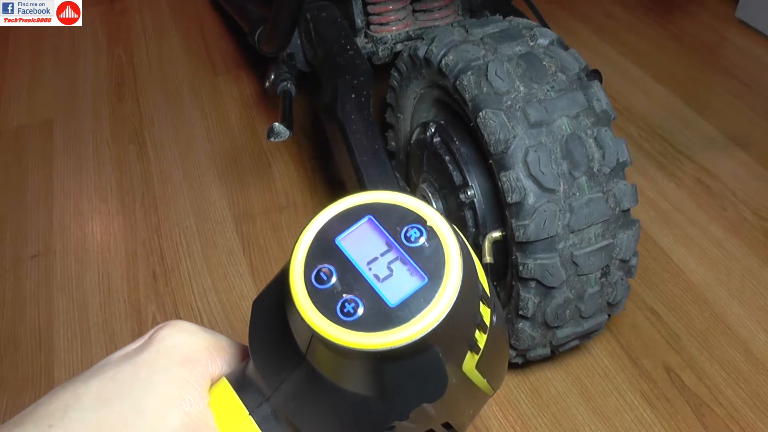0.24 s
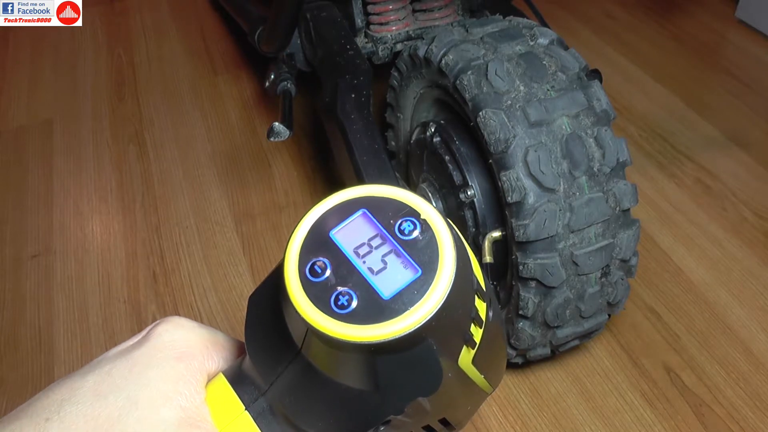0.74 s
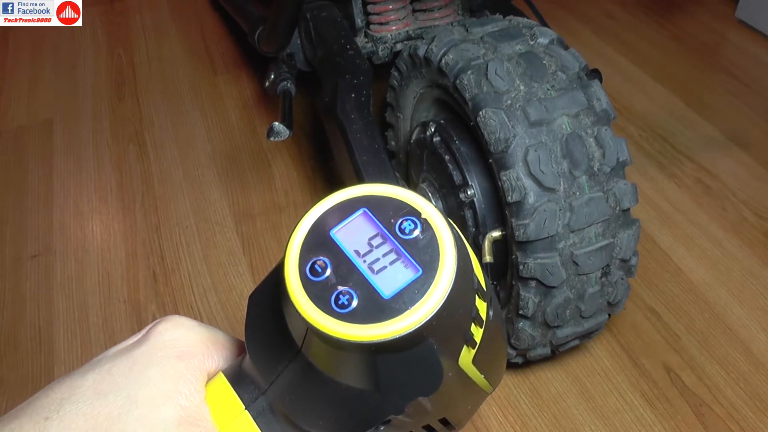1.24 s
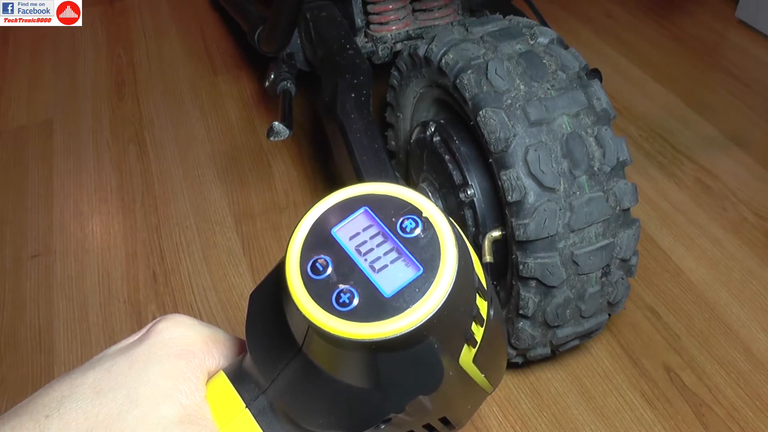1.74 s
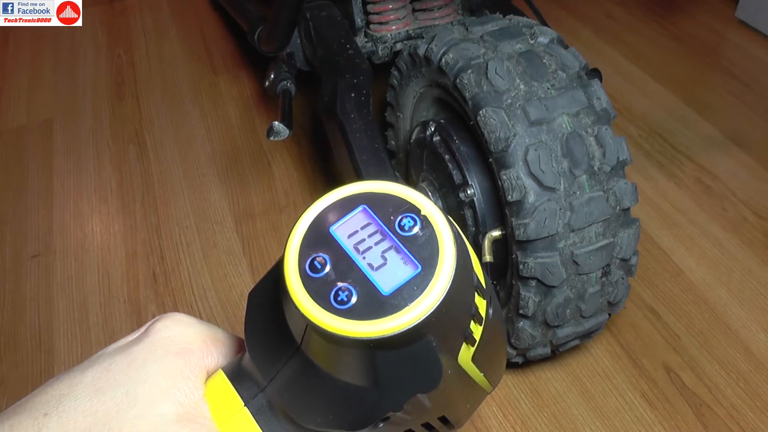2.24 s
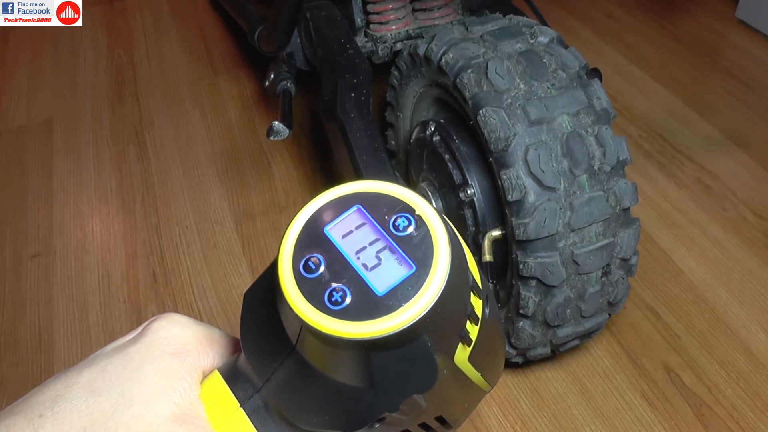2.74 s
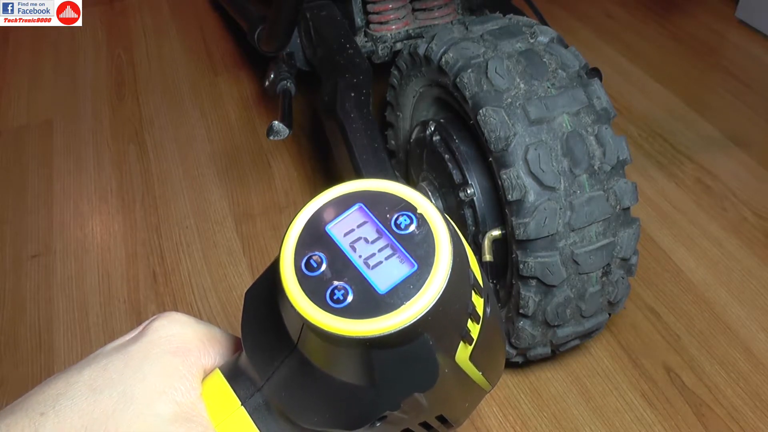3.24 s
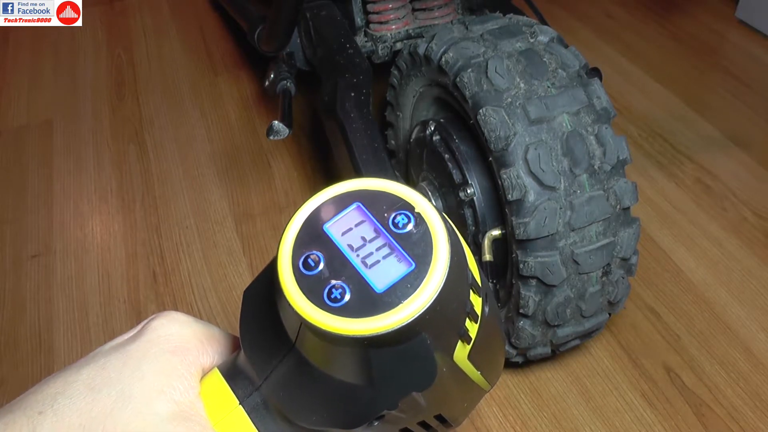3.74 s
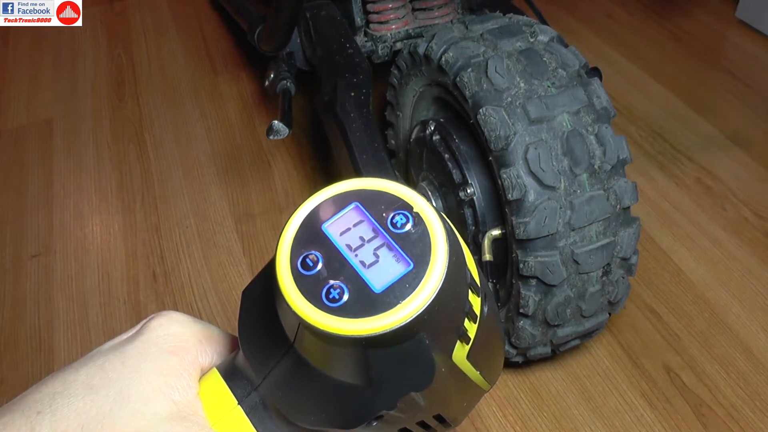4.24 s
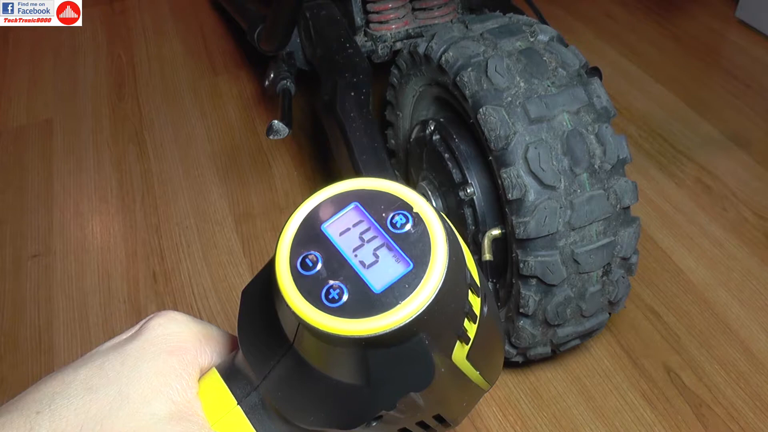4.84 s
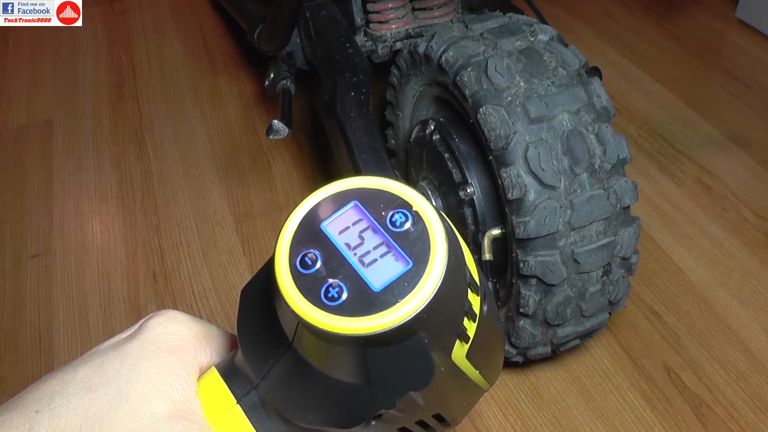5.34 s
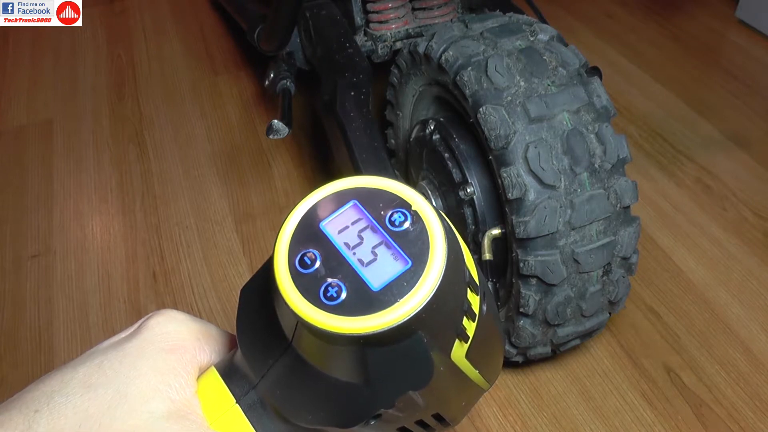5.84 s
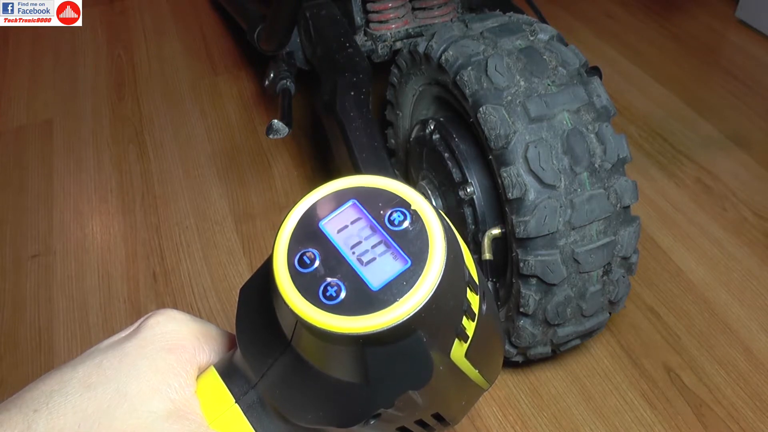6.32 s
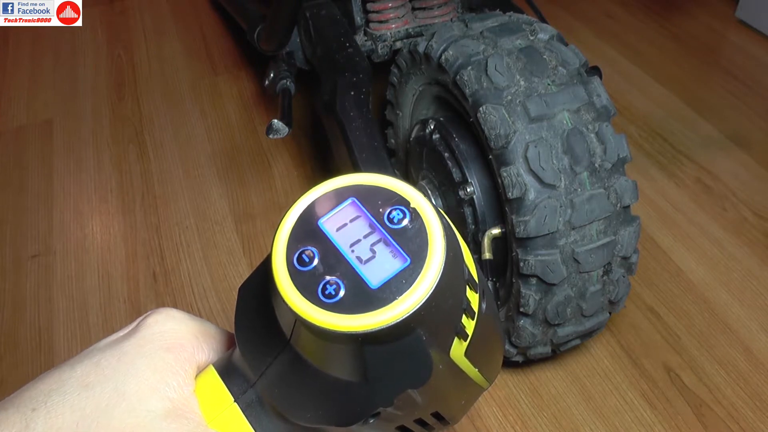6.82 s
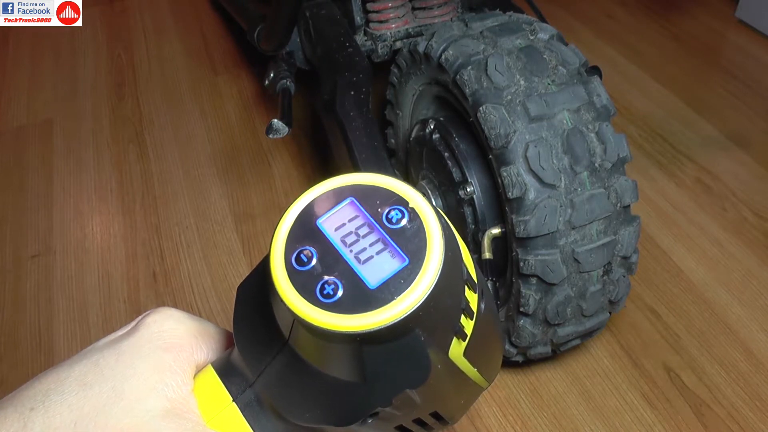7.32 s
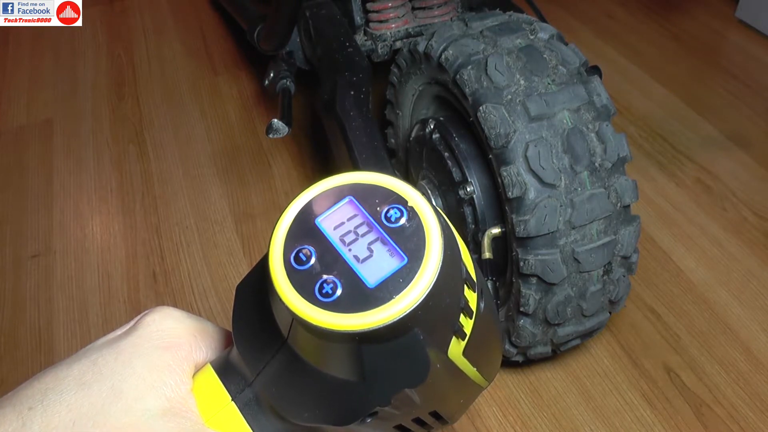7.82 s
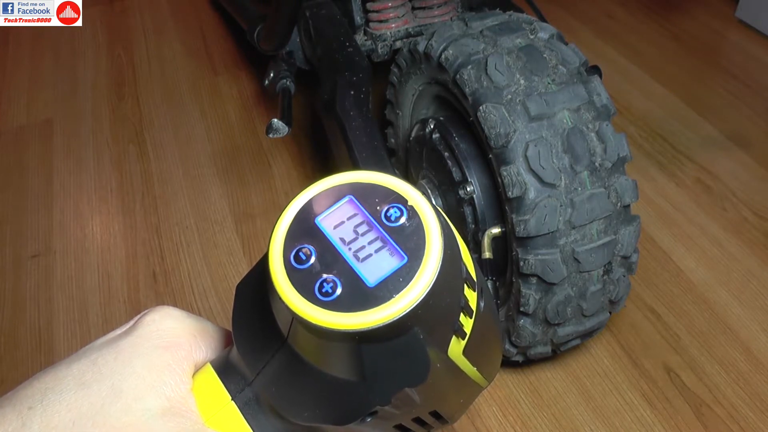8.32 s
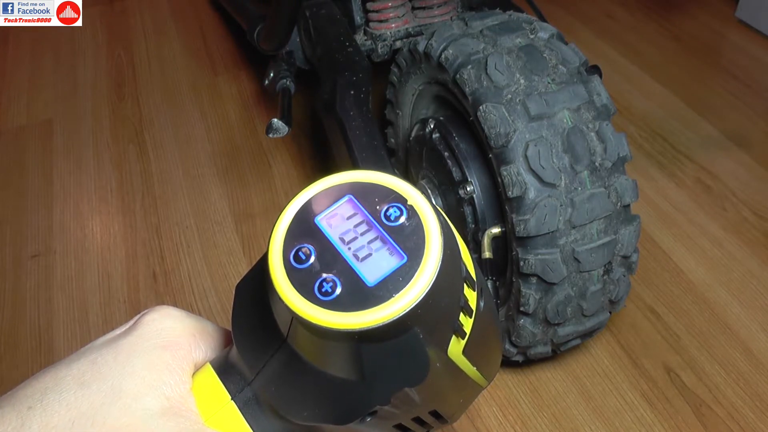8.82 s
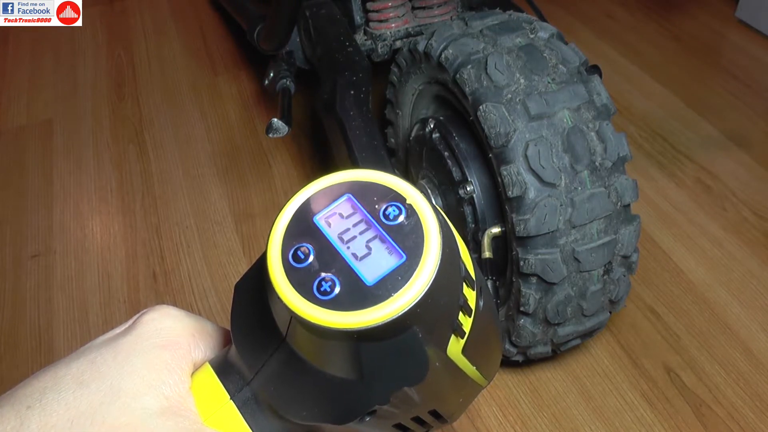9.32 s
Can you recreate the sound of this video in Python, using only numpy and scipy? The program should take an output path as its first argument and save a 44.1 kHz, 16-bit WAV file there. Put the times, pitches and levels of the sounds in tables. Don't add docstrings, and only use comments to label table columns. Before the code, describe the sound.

From 0 seconds a small hand-held battery air pump is already running at full speed, very close to the microphone, in a room with a wooden floor. Its single piston cycles about 52 times a second, too fast to count, merging into a coarse, nasal buzz. Over this sit a sharp, rough gear whine around 2.5 kHz with strong higher tones near 5 and 7.5 kHz, and a bright gritty rattle from the housing, pulsing with every stroke. Valve knocks and slaps add hard chatter in the low mids. Through 3 to 6 seconds the load increases and pitch sinks almost imperceptibly; the knock becomes brighter and harder. From 6 to about 9.6 seconds it is slightly louder and more strained, near 50 strokes a second, with stronger whine and valve ticking. Small unsteady flutters persist. Room reflections stay faint and short, and the pump never stops.

```python
import sys
import numpy as np
from scipy import signal
from scipy.fft import rfft, irfft, next_fast_len
from scipy.io import wavfile
from scipy.ndimage import uniform_filter1d

SR = 44100
rng = np.random.default_rng(int(sys.argv[2]) if len(sys.argv) > 2 else 0)


def dump_mix(stems):
    frames = np.atleast_2d(stems).T
    limited = np.clip(frames, -1, 1)
    pcm = np.round(limited * 32767).astype(np.int16)
    wavfile.write(sys.argv[1], SR, pcm)


def voltage_ratio(level):
    return 10 ** (np.asarray(level, float) / 20)


N = 422037

# time in seconds, crank rate in turns per second.
CRANK_SPEED = [(0.0, 52.23), (0.87, 51.964), (1.74, 51.687), (2.61, 51.418), (3.48, 51.186), (4.35, 50.988),
               (5.22, 50.664), (6.09, 50.423), (6.96, 50.295), (7.83, 50.046), (8.7, 49.892),
               (9.57, 49.785)]
START_TURN = 0.203
GEAR_TEETH, PINION_TEETH = 49, 11

# multiple of the crank rate, level in dB at low, middle and high pressure.
KNOCK_SPECTRUM = [(1, -61, -60.5, -60), (2, -44.8, -45.5, -44.5), (3, -45.8, -49.5, -49),
                  (4, -45.5, -43.5, -40.5), (5, -45, -45.5, -43), (6, -40, -41, -44.5),
                  (7, -43.4, -48, -48), (8, -36.5, -36.5, -38), (9, -49, -39.5, -34),
                  (10, -54.5, -34.5, -35), (11, -43.5, -37.5, -30.5), (12, -42.5, -35, -32.5),
                  (13, -37, -42.5, -39), (14, -31.5, -32.5, -36), (15, -36, -31.5, -32),
                  (16, -39.5, -33.5, -40.5), (17, -44.5, -36.5, -40), (18, -65.5, -40, -54),
                  (19, -56, -59, -42), (20, -45, -52.5, -47), (21, -41.5, -45, -54), (22, -43, -50, -50),
                  (23, -50.5, -49, -52)]
KNOCK_STAGES = (0.85, 5.05, 10)

TOOTH_LOAD = [(1, 0.87, 0.93, 5.0, 4.5), (2, 0.9, 0.9, 3.8, 2.8), (3, 0.97, 0.85, 3.6, 5.2),
              (4, 0.88, 0.95, 3.0, 2.6), (5, 0.85, 0.88, 2.6, 2.4), (6, .9, .9, 3, 3)]
# rms level in dB at low, middle and high pressure.
WHINE_LEVEL = [(-40.5, -37, -29), (-25.5, -26, -25), (-27.5, -24.5, -27.5), (-41, -35.5, -37.5),
               (-37.5, -37.5, -36), (-62, -54, -61)]
WHINE_ROUGHNESS = (0.13, 0.31, 0.32, 1, 0.95, .5)
HARMONIC_SHIFT = (-1, 0, -1, 0, 0, 0)
REVERSAL_HEIGHT = [(0.29, 0.1), (0.23, 0.49), (0.12, 0.35), (0.11, 0.52), (.05, 0.23), (.05, .3)]
PINION_WEAR = [(1, 0.52), (2, 0.22), (4, 0.23)]

# multiple of the motor rate, rms level in dB, swing with load 0-1.
MOTOR_TONES = [(1, -61, 0), (2, -56, 0.6), (3, -36.5, 0), (4, -84, 1), (5, -50.5, 0), (6, -53.5, 1),
               (8, -71, 1), (9, -53.5, 1)]

# frequency in Hz, density in dB per Hz.
RATTLE_SPECTRUM = [(150, -64), (350, -10), (700, -1), (1100, -12.5), (1650, -8), (2300, -9), (3100, -8.5),
                   (4400, -4.5), (5800, -5), (8300, -4.5), (10000, -22), (11500, -26), (13000, -12),
                   (15500, -26)]
# frequency in Hz, swing with load in dB.
RATTLE_SWING = [(300, -24), (1000, 7.5), (3000, 4), (6000, 4), (13000, 10.5)]
# frequency in Hz, share of the flaws still repeating.
FLAWS_REPEATING = [(2500, 1.0), (4500, .7), (7000, .5), (14000, .45)]
# frequency in Hz, width in Hz, level in dB at low and high pressure.
HOUSING_MODES = [(531, 39, -41.5, -50), (794, 110, -41.5, -43), (1085, 100, -41.5, -41),
                 (1873, 48, -41.5, -43.5), (2238, 157, -46, -36.5), (3620, 120, -55, -41),
                 (4138, 75, -41.5, -34.5), (6040, 220, -76, -84), (6600, 65, -42.5, -39.5),
                 (7660, 93, -38, -38), (8885, 480, -33, -34), (10050, 260, -33, -35),
                 (10460, 190, -47.5, -46), (12880, 200, -47, -40)]

# frequency in Hz, likeness of left and right 0-1.
STEREO_LIKENESS = [(60, .98), (290, 0.8), (640, 0.94), (1410, 0.93), (3100, 0.95), (5000, 0.95),
                   (7500, 0.95), (9500, 0.18), (12500, 0.53), (15000, .3)]
# frequency in Hz, left minus right in dB.
BALANCE_LOW = [(60, -6), (110, -1), (200, 0.5), (380, 0), (700, -1.5), (1290, -1), (2380, 2.5), (4400, 0),
               (8120, -0.5), (15000, -8)]
# frequency in Hz, left minus right in dB.
BALANCE_HIGH = [(60, -4), (110, -1.5), (200, -1), (380, -4), (700, 0), (1290, -1), (2380, 5.5), (4400, 1.5),
                (8120, 2.5), (15000, -5)]


def rms_one(x):
    return x / np.sqrt(np.mean(np.abs(x) ** 2) + 1e-20)


def in_time(rows):
    s, *columns = np.transpose(rows)
    return [np.interp(np.arange(N) / SR, s, c) for c in columns]


def at_hz(points, hz):
    table = np.array(points)
    return np.interp(np.log(hz), np.log(table[:, 0]), table[:, 1])


def with_pressure(*values):
    return np.interp(np.linspace(0, 1, N), np.linspace(0, 1, len(values)), values)


def drift(hz):
    sos = signal.butter(2, hz, fs=SR / 8, output="sos")
    settled = signal.sosfilt(sos, rng.standard_normal(N // 8 + 4002))[4000:]
    return np.interp(np.arange(N) / 8, np.arange(len(settled)), rms_one(settled))


def load(turn, centre, sharpness):
    return np.exp(sharpness * (np.cos(2 * np.pi * (turn - centre)) - 1))


def placed(x, hz):
    half_db = with_pressure(at_hz(BALANCE_LOW, hz), at_hz(BALANCE_HIGH, hz)) / 2
    return np.array([x * voltage_ratio(half_db), x * voltage_ratio(-half_db)])


def spread(pair, hz):
    alike = np.clip(at_hz(STEREO_LIKENESS, hz), 0, 1)
    shared = np.sqrt((1 + alike) / 2) * placed(pair[0], hz)
    opposed = np.sqrt((1 - alike) / 2) * pair[1] * [[1], [-1]]
    return shared + opposed


def knock(turn):
    valve_shuts = with_pressure(0.1266, 0.1716)
    shake_orders, shake_turn, shake_lead_cycles = 3, 0.13, 0.24
    log_size = np.log(voltage_ratio(np.array(KNOCK_SPECTRUM)[:, 1:].T))
    cepstrum = irfft(np.pad(log_size, ((0, 0), (1, 41)), mode="edge"), axis=1)
    cepstrum[:, 1:64] *= 2
    cepstrum[:, 65:] = 0
    lag = rfft(cepstrum, axis=1).imag
    since = 2 * np.pi * (turn - valve_shuts)
    uneven = 0.14 * drift(30)
    late = 0.004 * drift(30)
    seconds = np.arange(N) / SR
    lag_share, turned = with_pressure(0.81, 0.41), with_pressure(0.1, 0.72)
    out = 0
    for k, row in enumerate(KNOCK_SPECTRUM, start=1):
        high = min(k / 21.4, 1) ** 2
        phase = np.interp(seconds, KNOCK_STAGES, lag[:, k])
        size_db = np.interp(seconds, KNOCK_STAGES, row[1:])
        if k <= shake_orders:
            wave = np.cos(2 * np.pi * (k * (turn - shake_turn) + shake_lead_cycles))
        else:
            angle = since + high * late - 0.13 * (1 - high) ** 4
            wave = np.cos(k * angle + lag_share * phase + turned)
        out = out + placed(voltage_ratio(size_db) * (1 + high * uneven) * wave, 51 * k)
    return np.sqrt(2) * out


def gears(turn):
    idle_force = 0.06
    ripple = with_pressure(0.004, 0.024)
    angle = 2 * np.pi * turn + ripple * np.sin(2 * np.pi * (turn - 0.7)) + 0.0018 * drift(6.2)
    pinion = 2 * np.pi * turn * GEAR_TEETH / PINION_TEETH
    reversal = load(turn, 0.11, 4.5)
    out = 0
    for row, level_db, rough, shift, slack in zip(
            TOOTH_LOAD, WHINE_LEVEL, WHINE_ROUGHNESS, HARMONIC_SHIFT, REVERSAL_HEIGHT):
        k = round(row[0])
        force = load(turn, with_pressure(*row[1:3]), with_pressure(*row[3:5]))
        force = force + with_pressure(*slack) * reversal + idle_force
        wear = 0
        for m, depth in PINION_WEAR:
            for side in (-1, 1):
                wear = wear + depth * np.exp(1j * (side * round(m) * pinion + rng.uniform(0, 2 * np.pi)))
        waver = 1 + rough * (wear + 0.45 * (drift(113) + 1j * drift(110)))
        carrier = np.exp(1j * (k * GEAR_TEETH + shift) * angle)
        tone = rms_one(force * waver * carrier) * np.sqrt(2) * 1j ** (k // 3)
        level = voltage_ratio(with_pressure(*level_db) - 0.16 * drift(3.8))
        out = out + level * spread([tone.real, tone.imag], 2500 * k)
    return out


def motor(turn):
    out = 0
    for k, db, swing in MOTOR_TONES:
        order = round(k) * GEAR_TEETH / PINION_TEETH
        tone = np.cos(2 * np.pi * (order * turn + rng.random()))
        swell = 1 + 2 * swing * np.cos(2 * np.pi * (turn - 0.1))
        out = out + placed(np.sqrt(2) * voltage_ratio(db) * swell * tone, 51 * order)
    return out


def tooth_noise(turn):
    repeating = (0.71, 0.099)
    fresh = rng.standard_normal((2, 2, N))
    out = fresh * np.sqrt(max(1 - np.sum(np.square(repeating)), 0.05))
    for share, ratio in zip(repeating, (1, GEAR_TEETH / PINION_TEETH)):
        cells = 2 * round(430 / ratio)
        even_spectrum = np.exp(2j * np.pi * rng.random((2, 2, cells // 2 + 1)))
        flaws = rms_one(irfft(even_spectrum))
        out += share * flaws[..., (turn * ratio % 1 * cells).astype(int)]
    return out, fresh


def rattle(turn):
    teeth, air = tooth_noise(turn)
    blow = load(turn, 0.32, 5.4)
    squeeze = load(turn, 0.895, 1.6) + load(turn, 0.17, 3.9)
    rush = load(turn, 0.92, 2.6) + with_pressure(0.15, 0.64) * load(turn, 0.13, 4.5) + 0.057

    def source(k, hz):
        timing = blow if hz < 850 else squeeze if hz < 7500 else rush
        if hz < 900:
            return air[k % 2], timing
        kept = at_hz(FLAWS_REPEATING, hz)
        return kept * teeth[k % 2] + np.sqrt(1 - kept ** 2) * air[1 - k % 2], timing

    edges = 110 * 2 ** np.arange(0, 7.3, 0.4)
    bands = 0
    for k, (low, high) in enumerate(zip(edges, edges[1:])):
        hz = np.sqrt(low * high)
        noise, timing = source(k, hz)
        pair = signal.sosfilt(signal.butter(2, [low, high], "band", fs=SR, output="sos"), noise)
        level_db = at_hz(RATTLE_SPECTRUM, hz) + at_hz(RATTLE_SWING, hz) * timing + 0.94 * drift(34)
        bands = bands + spread(pair * voltage_ratio(level_db), hz)
    out = voltage_ratio(with_pressure(-30, -25)) * rms_one(bands)

    for k, (hz, width_hz, db_low, db_high) in enumerate(HOUSING_MODES):
        r = np.exp(-np.pi * width_hz / SR)
        noise, timing = source(k, hz)
        poles = [1, -2 * r * np.cos(2 * np.pi * hz / SR), r * r]
        rung = signal.lfilter([1, 0, -1], poles, noise * (0.11 + timing))
        level = voltage_ratio(with_pressure(db_low, db_high) + 0.24 * drift(11.0))
        out = out + level * spread(rms_one(rung), hz)
    return out


def valve_tick(turn):
    sos = signal.butter(2, [950, 1570], "band", fs=SR, output="sos")
    slap = load(turn, 0.15, 31) * voltage_ratio(3.0 * drift(25))
    burst = rng.standard_normal((2, N)) * slap
    return voltage_ratio(with_pressure(-49, -40)) * spread(rms_one(signal.sosfilt(sos, burst)), 1200)


def room(x):
    t60_s, wall_cut_hz = 0.37, 4900
    size = next_fast_len(N + SR)
    hz = np.arange(size // 2 + 1) * SR / size
    bass_cut = 1 / (1 + (250 / (hz + 1)) ** 2)
    out = []
    for channel, delays_s in zip(x, rng.uniform(0.008, 0.035, (2, 8))):
        echoes = 0
        for d in delays_s:
            one_round = voltage_ratio(-60 * d / t60_s) * np.exp(-2j * np.pi * hz * d) / (1 + 1j * hz / wall_cut_hz)
            echoes = echoes + one_round / (1 - one_round)
        out.append(irfft(rfft(channel, size) * bass_cut * echoes, size)[:N])
    return np.array(out)


def scene():
    turn = START_TURN + np.cumsum(in_time(CRANK_SPEED)[0]) / SR
    pump = knock(turn) + gears(turn) + motor(turn) + rattle(turn) + valve_tick(turn)
    return pump + voltage_ratio(-22) * room(pump)


def top_cut(x):
    return signal.sosfilt(signal.butter(12, 15760, fs=SR, output="sos"), x)


def record(dry):
    heard = signal.sosfilt(signal.butter(6, 14800, fs=SR, output="sos"), dry)
    body = signal.sosfiltfilt(signal.cheby2(12, 40, 15480, fs=SR, output="sos"), heard)
    kept = np.repeat(rng.random(N // 1024 + 2) < 0.6, 1024)[528:528 + N]
    flicker = uniform_filter1d(np.where(kept, 1, voltage_ratio(-16)), 400)
    return top_cut(body + flicker * (heard - body))


dry = scene()
out = record(dry)
dump_mix(out)
```